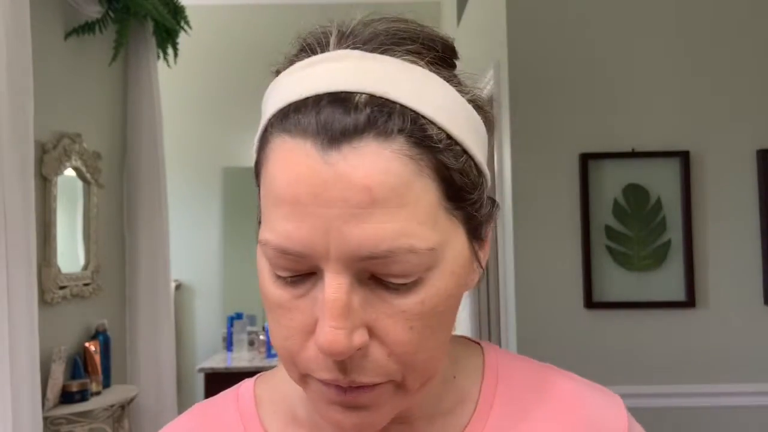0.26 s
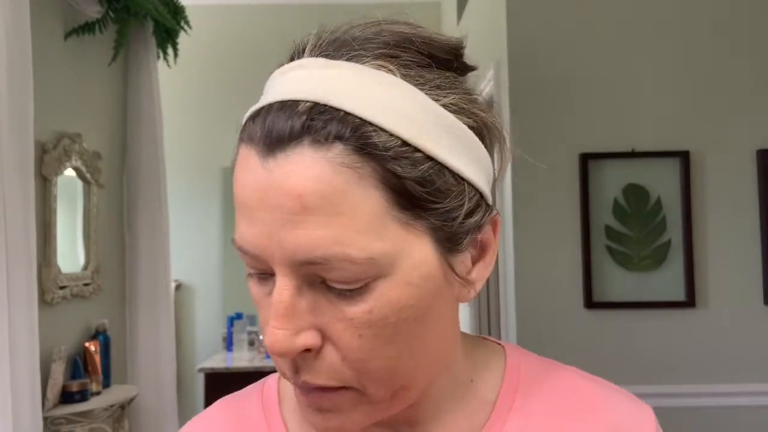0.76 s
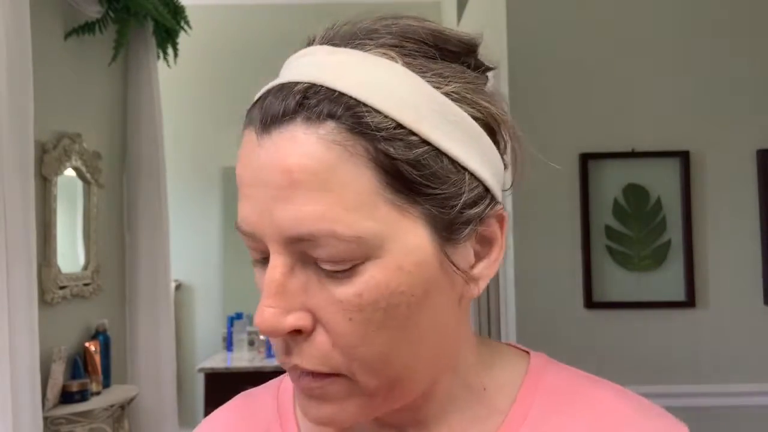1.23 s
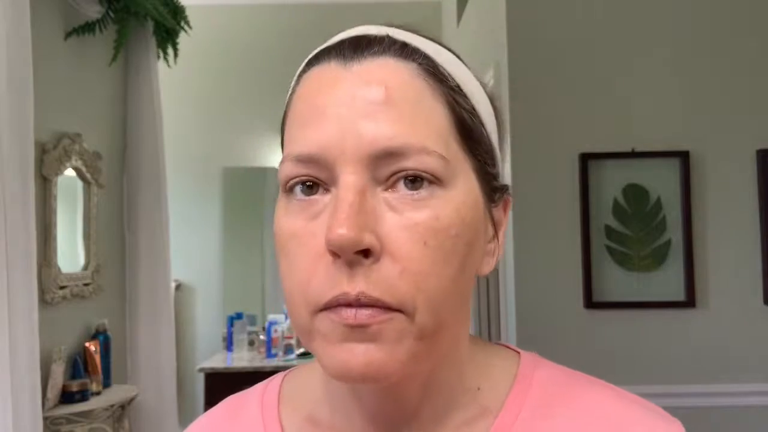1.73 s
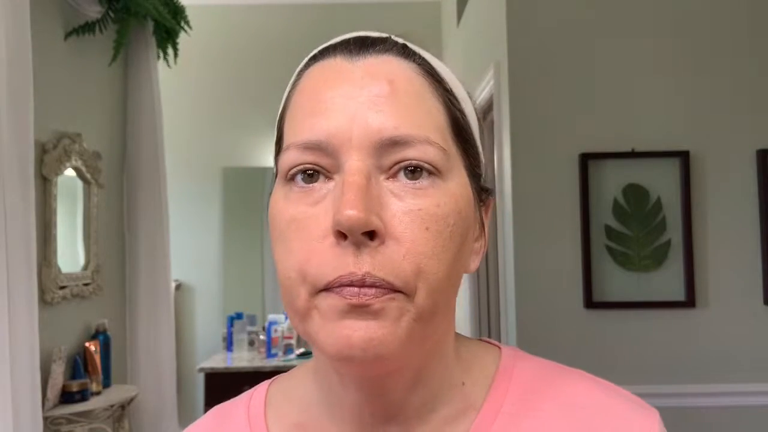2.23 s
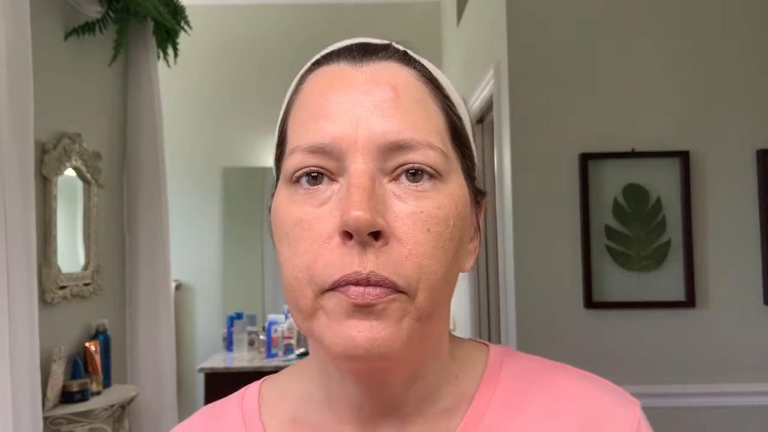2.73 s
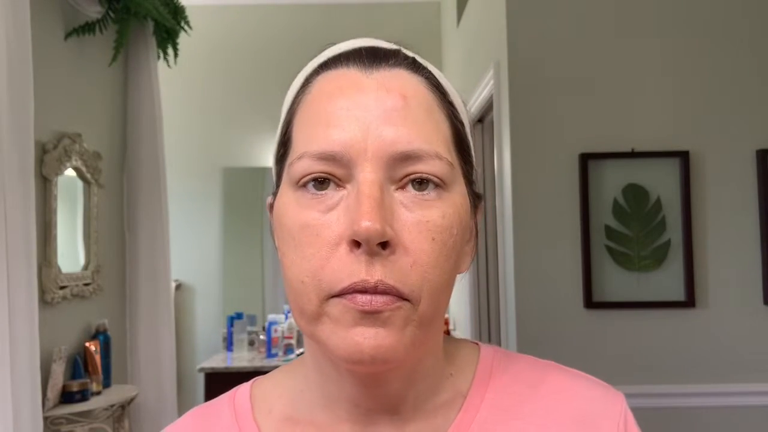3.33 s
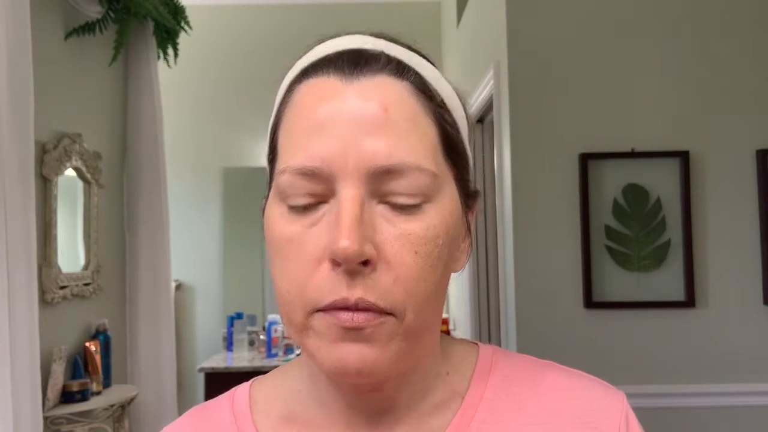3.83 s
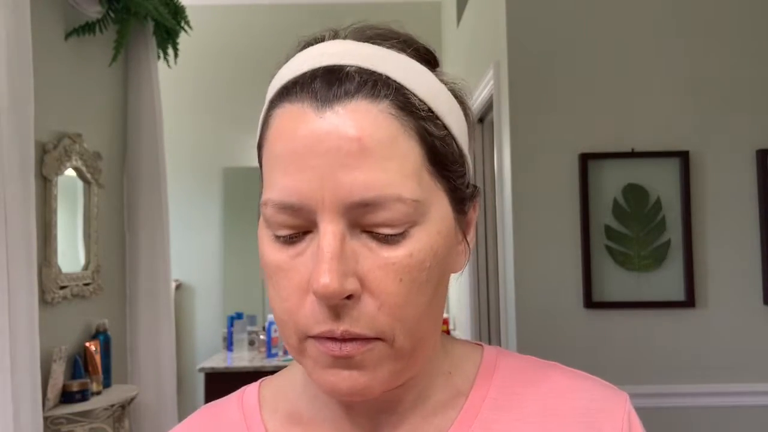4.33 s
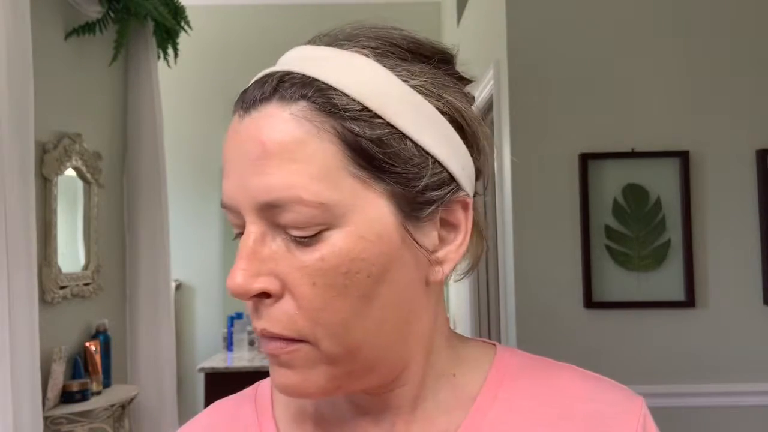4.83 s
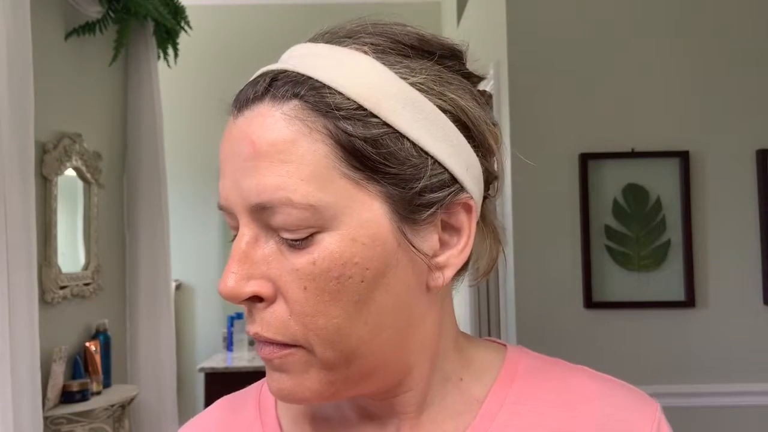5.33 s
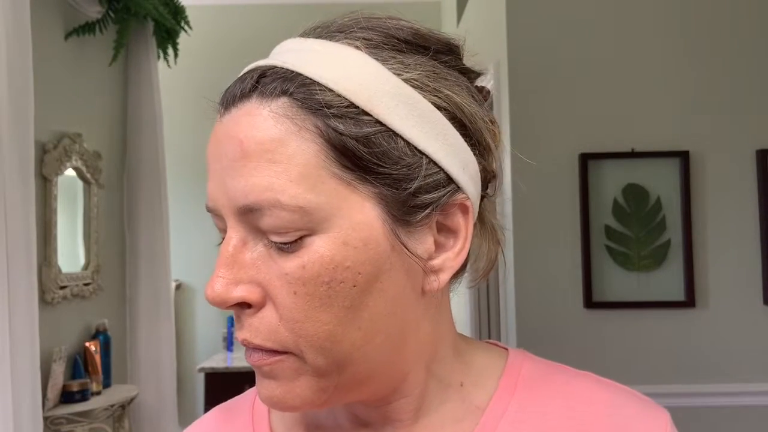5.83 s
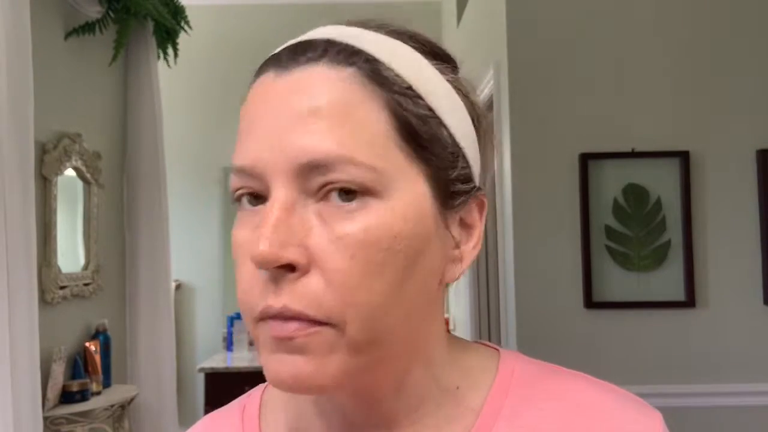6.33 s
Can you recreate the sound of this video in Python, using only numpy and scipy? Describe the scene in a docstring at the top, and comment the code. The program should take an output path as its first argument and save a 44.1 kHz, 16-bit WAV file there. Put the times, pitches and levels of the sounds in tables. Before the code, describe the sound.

Small plastic cosmetic containers are set down one by one on a wooden table with sharp clacks and light taps, over a low fan hum.

```python
"""Makeup containers on a wooden table

Containers are picked up and set down in a small, hard-walled room over a ventilation fan.
Each blow rings a container's damped modes and thuds the table top; nails tick, brush handles tap.
Scuffs, drags and pushes are grains of friction noise; the fan is low lines plus coloured noise.
A phone with two microphone ports stands close by: direct sound, room reflections, top cut."""
import sys
import numpy as np
from scipy import signal
from scipy.fft import rfft, irfft
from scipy.io import wavfile

SR = 44100
rng = np.random.default_rng(int(sys.argv[2]) if len(sys.argv) > 2 else 0)


def unload_audio(sound):
    """Save the sound as a 16-bit wav file, at the path given as the first command line argument."""
    columns = np.transpose(np.atleast_2d(sound))
    # keep every value between -1 and 1, then stretch to whole-number steps
    steps = np.round(np.clip(columns, -1, 1) * 32767)
    wavfile.write(sys.argv[1], SR, steps.astype(np.int16))


N = 289648
TIME = np.arange(N) / SR  # s


def undb(db):
    """Decibels to gain."""
    return 10 ** (np.asarray(db) / 20)


def unit(x):
    """Scale to an energy of one."""
    return x / np.sqrt(np.sum(x ** 2))


def lookup(points, hz):
    """Read (Hz, value) points on a log-frequency axis."""
    point_hz, value = np.transpose(points)
    return np.interp(np.log(np.maximum(hz, 1)), np.log(point_hz), value)


def bins(x):
    """Frequencies of the spectrum of x, Hz."""
    return np.fft.rfftfreq(x.shape[-1], 1 / SR)


def colour(x, points):
    """Filter by (Hz, dB) points."""
    return irfft(rfft(x) * undb(lookup(points, bins(x))), x.shape[-1])


def brighten(x, slope_db):
    """Causal tilt in dB/octave about 2.5 kHz, level below 800 Hz: a harder contact is brighter."""
    octaves = np.log2(np.maximum(bins(x), 800) / 2500)
    log_gain = np.log(undb(slope_db * octaves))
    # fold the cepstrum: minimum phase
    cepstrum = irfft(log_gain, len(x))
    cepstrum[1:len(x) // 2] *= 2
    cepstrum[len(x) // 2 + 1:] = 0
    return irfft(rfft(x) * np.exp(rfft(cepstrum)), len(x))


def add(track, s, x):
    """Mix x into the track at time s."""
    i = int(s * SR)
    track[..., i:i + x.shape[-1]] += x[..., :N - i]


def ring(modes, scatter_db):
    """Damped modes of alternating sign; their strengths depend on where the blow lands."""
    t = TIME[:SR // 3]
    hz, width_hz, db = np.transpose(modes)[:, :, None]
    strength = width_hz * undb(db + scatter_db * rng.standard_normal(hz.shape))
    strength[1::2] *= -1
    decay = np.exp(-np.pi * width_hz * t)
    return unit(np.sum(strength * decay * np.sin(2 * np.pi * hz * t), axis=0))


def chatter(x, gap_s, rebound, count=3):
    """Micro-bounces of a settling edge: all-pass combs spread a blow in time, keep its colour."""
    spectrum, g = rfft(x), np.clip(rebound, 0, .8)
    for gap in gap_s * (.5 + rng.random(count)):
        delay = np.exp(-2j * np.pi * bins(x) * np.ceil(gap * SR) / SR)
        spectrum = spectrum * (delay - g) / (1 - g * delay)
    return irfft(spectrum, len(x))


# treble dips in fan, slides and reverberation: f/Hz, width/Hz
TREBLE_DIPS = [(9750, 1300), (13600, 1600)]


def dip_treble(x):
    """Two narrow treble dips, for fan, slides and reverberation."""
    for hz, width_hz in TREBLE_DIPS:
        x = signal.lfilter(*signal.iirnotch(hz, hz / width_hz, fs=SR), x)
    return x


# reverberation: f/Hz, t60/s
ROOM_DECAY = [(100, 1.2), (300, .5), (800, 0.73), (2000, 0.64), (4000, 0.6153), (8000, 0.44), (15000, 0.55)]
# reflections: f/Hz, level/dB
WALL_COLOUR = [(100, -7.5), (400, 9.5), (750, 4.5), (1500, 1.5), (3000, 0.5), (5000, -0.5), (8000, 2),
               (15000, -11.5)]


def room(x, near_db, early_db, early_s, late_db):
    """Table-top scatter, quick wall reflections, diffuse tail: decaying noise, bass alike at both ports."""
    t = TIME[:SR]
    mid, side = rng.standard_normal((2, len(t)))
    hz = bins(t)
    alike = 1 / (1 + (hz / 420) ** 2)
    side_sign = np.array([[1], [-1]])
    field = rfft(mid) * np.sqrt(1 + alike) + side_sign * rfft(side) * np.sqrt(1 - alike)
    octave = np.log2(np.clip(hz, 125, 16000) / 125)
    tail = 0
    for k in np.arange(8):
        t60_s = lookup(ROOM_DECAY, 125 * 2 ** k)
        band = irfft(field * np.maximum(1 - abs(octave - k), 0))
        tail = tail + band * np.exp(-np.log(1000) * t / t60_s)
    late = tail * np.clip(t / 0.0074, 0, 1)
    near = irfft(field) * np.exp(-t / 0.00098)
    early = irfft(field) * np.exp(-t / early_s) * (t > .002)
    walls = undb(early_db) * unit(early) + undb(late_db) * unit(late)
    response = undb(near_db) * unit(near) + dip_treble(colour(walls, WALL_COLOUR))
    return signal.fftconvolve(x[None], response, axes=1)[:, :N]


def ports(x, lag_ms, left_db=0):
    """Direct sound: the things stand to the left, so the right port hears them later, if lagged."""
    late = np.interp(TIME - lag_ms / 1000, TIME, x)
    return np.array([x * undb(left_db / 2), late * undb(-left_db / 2)])


CATCH_HZ, CATCH_DB = 260, 4.5  # stick-slip cluster rate, unevenness


def catches(grain_db):
    """A quarter second of stick and slip: fine grains that arrive in uneven clusters."""
    t = TIME[:SR // 4]
    grains, size, grip = rng.standard_normal((3, len(t)))
    clusters = np.interp(t * CATCH_HZ, np.arange(len(t)), grip)
    return grains * undb(grain_db * np.minimum(size, 2) + CATCH_DB * clusters)


RATTLE_S, RATTLE_GRAIN_DB, RATTLE_WIDEN = 0.015, 3, 2.3  # decay, unevenness, mode-width factor


def rattle(modes):
    """Loose lids and contents buzz briefly against the shell, damped by their own contact."""
    grains = catches(RATTLE_GRAIN_DB)
    buzz = grains * np.exp(-TIME[:len(grains)] / RATTLE_S)
    damped_modes = [(hz, width_hz * RATTLE_WIDEN, db) for hz, width_hz, db in modes]
    shell = ring(damped_modes, scatter_db=2)
    return unit(signal.fftconvolve(buzz, shell)[:len(shell)])


RADIATION_HZ = 540  # small shells radiate little below this


def container(blows, modes, gain_db, gap_s, rebound, crack_hz, rattle_db=None):
    """Each blow rings the shell's modes, plus a dry contact crack and a rattle of any loose parts."""
    out, t = np.zeros(N), TIME[:SR // 3]
    contact = unit(t * np.exp(-2 * np.pi * crack_hz * t))
    for s, db, slope_db, crack_db in blows:
        shell = chatter(ring(modes, scatter_db=1.25), gap_s, rebound)
        if rattle_db is not None:
            shell = shell + undb(rattle_db) * rattle(modes)
        crack = undb(crack_db) * chatter(contact, gap_s, rebound)
        add(out, s, undb(db + gain_db) * brighten(shell + crack, slope_db))
    high_pass = signal.butter(2, RADIATION_HZ, "high", fs=SR, output="sos")
    return signal.sosfilt(high_pass, out)


# fan and motor lines: f/Hz, level/dB
FAN_LINES = [(37.7, -57.5), (59.2, -57.5), (98.8, -52.5)]
# air rush, relative: f/Hz, level/dB
AIR_COLOUR = [(20, -7.5), (38, -18), (60, 0.5), (80, -11.5), (105, -12.5), (125, -11.5), (150, -31.5),
              (270, -22), (420, -32.5), (700, -47), (1350, -45), (2200, -53.5), (6000, -62), (11000, -55),
              (16000, -63.5)]
AIR_DB = -52.5


def fan(waver, beat_hz):
    """Wavering low lines over a soft rush of air, whose bass is shared by both ports."""
    hum = 0
    knots_s = np.arange(0, TIME[-1] + 1, 1 / beat_hz)
    for hz, db in FAN_LINES:
        a, b = (np.interp(TIME, knots_s, rng.standard_normal(len(knots_s))) for _ in range(2))
        phase = 2 * np.pi * (hz * TIME + rng.random())
        line = (1 + waver * a) * np.sin(phase) + waver * b * np.cos(phase)
        hum = hum + undb(db) * np.sqrt(2) * line
    mid, side = (colour(rng.standard_normal(N), AIR_COLOUR) for _ in range(2))
    side = colour(side, [(60, -17.5), (150, -11.0), (400, -11.5), (1500, 0.0), (8000, -0.5)])
    air = (mid + np.array([[1], [-1]]) * side) / np.std(mid)
    return undb(-2.0) * hum + undb(AIR_DB) * air


TICK_CRACK_DB = -12  # re ring, ticks and taps
# nail ticks: t/s, level/dB, brightness/(dB/octave)
NAIL_TICKS = [(0.3456, -37, 5.5), (0.361, -30, -2), (0.5769, -23, -4.5), (0.639, -30.5, -2.5),
              (0.6959, -32, 0), (0.718, -27, -4.5), (0.728, -49, -9), (0.74, -28.5, -2.5),
              (1.864, -48.5, -1.5), (4.238, -34, -2), (4.258, -40, -5), (4.349, -35, -2), (6.4, -36, -3)]
# tick modes: f/Hz, width/Hz, level/dB
TICK_MODES = [(2350, 1360, -7.5), (4530, 3600, -9.5), (8570, 220, 1), (12300, 890, -5), (15440, 1800, -11)]


def ticks():
    """Nails tick on plastic: very short, broad modes."""
    blows = [(*tick, TICK_CRACK_DB) for tick in NAIL_TICKS]
    return container(blows, TICK_MODES, gain_db=3.5, gap_s=0.00037, rebound=0.9, crack_hz=9390)


# set-downs: t/s, level/dB, brightness/(dB/octave), crack/dB, table thud/dB, frame boom/dB,
# edge thud f/Hz, base thud f/Hz, time until flat/s, thing
CONTAINER_SET_DOWNS = [(0.4467, -11, -2, -16, -26, -8.5, 447.4, 460, 0.01, "compact"),
                       (2.3513, -14, -1, -26, -27, -22, 300, 215, 0.0075, "jar"),
                       (3.1532, -15, 0, -2.5, -29, -39, 520, 180, 0.0033, "pot"),
                       (4.0546, -16, 0, -4, -27.5, -13.5, 400, 170, 0.0032, "tube"),
                       (5.926, -13.5, 1, -12, -25, -7, 500, 190, .007, "bottle"),
                       (6.1758, -7, -2.2, -21.5, -31.5, -7.5, 344, 232, 0.004, "case")]
# hand nudges, scuff and rock: t/s, level/dB, brightness/(dB/octave), table thud/dB, frame boom/dB,
# thud f/Hz, thing
HAND_NUDGES = [(0.647, -42.5, -8.5, -40.5, -10, 540, "compact"),
               (0.654, -45, -14, -40, -24, 700, "compact"), (0.676, -38, -5, -55, -16, 556, "compact"),
               (0.736, -36.5, -11, -37.5, -30, 560, "compact"), (0.832, -59, -15, -49, -36, 600, "compact"),
               (2.502, -40, -3, -42.5, -37, 427, "jar"), (2.695, -34, 0, -41, -30.5, 220, "case"),
               (2.704, -40.5, -2.5, -48.5, -35, 260, "case"), (2.716, -63.5, 5, -59.5, -39.5, 260, "case"),
               (2.885, -49, -0.5, -44.5, -44, 236, "pot"), (3.119, -31.5, -0.5, -33.5, -28, 496, "pot"),
               (3.149, -31, 2.5, -29.5, -28.5, 570, "pot"), (3.189, -35.5, -7.5, -41.5, -29.5, 614, "pot"),
               (3.399, -47, 1, -41, -46, 540, "pot"), (3.913, -37.5, -0.5, -42, -38.5, 513, "tube"),
               (4.043, -33.5, -5, -33.5, -34, 510, "tube"), (4.257, -36.5, -1, -39.5, -17, 305, "tube"),
               (4.342, -41, -7, -35.5, -14.5, 290, "tube"), (4.386, -38, -6.5, -37.5, -33, 412, "tube"),
               (4.394, -32, -6, -43.5, -21, 413, "tube")]
ROCK_S, NUDGE_CRACK_DB, NUDGE_BASE_HZ = 0.0069, -10.5, 241.1


def landings():
    """Set-downs and nudges alike, in the columns of the set-downs."""
    rocks = [(s, db, slope_db, NUDGE_CRACK_DB, thud_db, frame_db, thud_hz, NUDGE_BASE_HZ, ROCK_S, thing)
             for s, db, slope_db, thud_db, frame_db, thud_hz, thing in HAND_NUDGES]
    return CONTAINER_SET_DOWNS + rocks


# base blow re edge blow: softer, duller, more crack re ring
FLAT_DB, FLAT_SLOPE_DB, FLAT_CRACK_DB = -12.5, -4, 6.5


def blows_on(name):
    """Two blows per landing of one thing, edge then base: (t/s, level/dB, brightness, crack/dB)."""
    blows = []
    for s, db, slope_db, crack_db, _, _, _, _, flat_s, thing in landings():
        if thing == name:
            edge = (s, db, slope_db, crack_db)
            base = (s + flat_s, db + FLAT_DB, slope_db + FLAT_SLOPE_DB, crack_db + FLAT_CRACK_DB)
            blows += [edge, base]
    return blows


# compact modes: f/Hz, width/Hz, level/dB
COMPACT_MODES = [(743, 170, -12.5), (1050, 280, -10.5), (1430, 390, -14.5), (1892, 220, -10),
                 (2350, 250, -9), (2720, 280, -1.5), (3222, 380, 3), (3628, 480, 0.5), (4336, 540, 3),
                 (4820, 610, 0), (5554, 480, -12.5), (6600, 790, -22), (8556, 900, -18),
                 (10900, 440, -16.5)]


def compact():
    """Compact: shell modes strongest at 2.7-4.8 kHz, loose parts rattle."""
    return container(blows_on("compact"), COMPACT_MODES, gain_db=15.5, gap_s=0.0003, rebound=0.57,
                     crack_hz=5010, rattle_db=-11)


# table-top modes: f/Hz, width/Hz, level/dB
TOP_MODES = [(161, 32.3, 3.5), (210, 45, 1), (250, 27, 0), (292, 20, -4.5), (327, 34, -1), (364, 40, -4.5),
             (457, 40, -2.5), (537.4, 46, -1.5), (665, 50, -14), (928, 140, -12)]


def table_modes(centre_hz, focus_db):
    """A contact favours the table modes near its own pitch, by focus_db per octave."""
    return [(hz, width_hz, db - focus_db * abs(np.log2(hz / centre_hz)))
            for hz, width_hz, db in TOP_MODES]


# table-frame modes: f/Hz, width/Hz, level/dB
FRAME_MODES = [(97.6, 3.7, 5.5), (114, 13, -3.5), (156, 30, -13)]
FLAT_THUD_DB = -2  # base thud re edge thud


def table(focus_db):
    """Edge and base each thud the wooden top; the weight then rocks the frame."""
    out = np.zeros(N)
    for s, _, _, _, thud_db, frame_db, edge_hz, base_hz, flat_s, _ in landings():
        edge = (s, thud_db, edge_hz)
        base = (s + flat_s, thud_db + FLAT_THUD_DB, base_hz)
        for at_s, blow_db, centre_hz in [edge, base]:
            thud = ring(table_modes(centre_hz, focus_db), scatter_db=3.0)
            add(out, at_s, undb(blow_db + 15.0) * thud)
        add(out, s + flat_s, undb(frame_db) * ring(FRAME_MODES, scatter_db=5.0))
    direct = undb(2.0) * ports(out, lag_ms=0.18, left_db=0.1)
    return direct + room(out, near_db=-15, early_db=-3.5, early_s=0.0073, late_db=-3.5)


# friction colour: f/Hz, level/dB
FRICTION_COLOUR = [(300, -28), (780, -22), (1000, -9), (1230, 0), (1450, -7), (2100, -6.5), (3200, -12),
                   (4600, -12.5), (6000, -17), (8500, -13), (12500, -18), (16000, -25)]
# drags over the wood: t/s, length/s, level/dB, brightness/(dB/octave)
WOOD_DRAGS = [(0.589, 0.12, -52, -1.5), (0.798, 0.11, -63, -16), (4.214, 0.096, -44, 10.5),
              (4.29, 0.081, -44.5, 10), (4.646, 0.12, -59, -4), (4.701, 0.058, -41.5, 4.5),
              (4.722, 0.079, -38.5, -1.5)]
# a scuff leads its nudge; level and brightness re nudge
SCUFF_LEAD_S, SCUFF_S, SCUFF_DB, SCUFF_SLOPE_DB = 0.02, 0.049, -24.5, 1.5
DRAG_SWELL_DB = 4.5  # rise over a drag, on top of the stroke


def slides(grain_db):
    """Friction: tiny catches of uneven size, swelling and fading with the stroke."""
    out, t = np.zeros(N), TIME[:SR // 4]
    scuffs = [(s - SCUFF_LEAD_S, SCUFF_S, db + SCUFF_DB, slope_db + SCUFF_SLOPE_DB, 0)
              for s, db, slope_db, *_ in HAND_NUDGES]
    drags = [(*drag, DRAG_SWELL_DB) for drag in WOOD_DRAGS]
    for s, length_s, db, slope_db, swell_db in scuffs + drags:
        progress = np.clip(t / length_s, 0, 1)
        stroke = np.sin(np.pi * progress) * undb(swell_db * (progress - 3.0))
        rub = brighten(colour(catches(grain_db), FRICTION_COLOUR), slope_db)
        add(out, s, undb(db) * stroke * rub / np.std(rub))
    direct = ports(out, lag_ms=0.077)
    return direct + room(out, near_db=-13.5, early_db=3.5, early_s=0.0057, late_db=-3)


# handle taps: t/s, level/dB, brightness/(dB/octave), f/Hz
HANDLE_TAPS = [(0.677, -37, 3, 2700), (0.718, -35.5, 4, 2750), (1.265, -37.5, 0, 2450),
               (2.952, -40.5, -1.5, 1900), (3.665, -47, -2.5, 2350), (5.054, -38, -0.5, 1970),
               (5.224, -37.5, 0, 2050)]
# handle modes: f/tap f, width/Hz, level/dB
HANDLE_MODES = [(.73, 826, -9), (1, 200, 1.5), (1.22, 230, -9), (1.67, 660, -13), (2.41, 730, -23),
                (3.97, 618, -11.5), (6.1, 1500, -14.5)]


def taps():
    """Brush handles tap with a short woody note: modes scale with each tap's pitch."""
    out = np.zeros(N)
    for s, db, slope_db, hz in HANDLE_TAPS:
        modes = [(ratio * hz, width_hz, mode_db) for ratio, width_hz, mode_db in HANDLE_MODES]
        out += container([(s, db, slope_db, TICK_CRACK_DB)], modes, gain_db=1.0, gap_s=0.00041,
                         rebound=0.72, crack_hz=9000)
    return out


# slow pushes along the wood: t/s, length/s, rub level/dB, table level/dB
SLOW_PUSHES = [(1.804, 0.074, -61.5, -84), (1.843, 0.13, -60, -60.5), (1.949, 0.11, -69.5, -71)]
# container-base modes: f/Hz, width/Hz, level/dB
BASE_MODES = [(760, 180, -3.5), (970, 170, -0.5), (1134, 126, 4), (1290, 160, -1), (1414, 75, -4.5),
              (2450, 190, -17)]


def pushes(grain_db):
    """Slow, soft friction hums dully in the container's base and in the table top."""
    out, t = np.zeros(N), TIME[:SR // 4]
    for s, length_s, rub_db, table_db in SLOW_PUSHES:
        stroke = np.sin(np.pi * np.clip(t / length_s, 0, 1))
        top_modes = table_modes(centre_hz=500, focus_db=17)
        for modes, db in [(BASE_MODES, rub_db), (top_modes, table_db)]:
            rub = signal.fftconvolve(catches(grain_db), ring(modes, scatter_db=1))[:len(t)]
            add(out, s, undb(db) * stroke * rub / np.std(rub))
    direct = undb(-3.0) * ports(out, lag_ms=0, left_db=4.5)
    return direct + room(out, near_db=-20, early_db=-12, early_s=0.017, late_db=-9)


# jar modes: f/Hz, width/Hz, level/dB
JAR_MODES = [(1264, 160, -7), (1510, 190, -6.5), (2170, 140, 2), (2380, 240, 0.5), (2700, 220, -3),
             (2880, 250, -8), (3540, 110, -2), (3880, 140, -5), (4710, 210, -10.5), (5030, 120, -8.5),
             (7200, 1100, -17.5), (8500, 150, -9.5), (11360, 1000, -20.5), (15360, 1400, -23.5)]


def jar():
    """Jar: mostly narrow shell modes from 1.3 kHz up, loose parts rattle."""
    return container(blows_on("jar"), JAR_MODES, gain_db=9.0, gap_s=0.00066, rebound=0.45,
                     crack_hz=12800, rattle_db=-11.5)


# case modes: f/Hz, width/Hz, level/dB
CASE_MODES = [(870, 210, -12.5), (1090, 94, -3.5), (1286, 110, -1.5), (1490, 83, 4.5), (1700, 120, 2.5),
              (2045, 91, 1.5), (2260, 61, 4), (2760, 220, -1.5), (3100, 290, -3), (3720, 520, -9),
              (4500, 720, -12.5), (5900, 3800, -20.5), (8670, 670, -16.5), (11200, 900, -23)]


def case():
    """Case: shell modes strongest at 1.5-2.3 kHz, no rattle."""
    return container(blows_on("case"), CASE_MODES, gain_db=8.0, gap_s=0.00056, rebound=0.51,
                     crack_hz=4040)


# pot modes: f/Hz, width/Hz, level/dB
POT_MODES = [(745, 60, -6), (960, 75, 2), (1265, 160, -1.5), (1560, 320, 1), (1800, 260, 4.5),
             (2280, 450, 0), (2640, 260, 3.5), (3580, 220, 4), (3966, 260, 2), (4550, 500, -6),
             (5440, 630, -17.5), (8130, 400, -9.5), (11800, 2200, -11.5), (14700, 1700, -8.5)]


def pot():
    """Pot: shell modes strongest at 1-4 kHz, with the strongest rattle."""
    return container(blows_on("pot"), POT_MODES, gain_db=10.0, gap_s=.0006, rebound=0.53,
                     crack_hz=12100, rattle_db=-7)


# tube modes: f/Hz, width/Hz, level/dB
TUBE_MODES = [(900, 200, -5.5), (1286, 200, 3.5), (1600, 250, 0), (2000, 160, 3), (2320, 200, 5),
              (2790, 260, 1.5), (3560, 600, -2.5), (4820, 480, -4), (6700, 730, -8.5), (8200, 700, -8.5),
              (11360, 190, 1)]


def tube():
    """Tube: shell modes strongest at 1.3-2.8 kHz, loose parts rattle."""
    return container(blows_on("tube"), TUBE_MODES, gain_db=11.0, gap_s=0.00055, rebound=0.57,
                     crack_hz=9000, rattle_db=-9.5)


# bottle modes: f/Hz, width/Hz, level/dB
BOTTLE_MODES = [(660, 83, -9.5), (868, 48, 0), (1115, 110, -3), (1230, 116, 0), (1420, 200, 2),
                (1700, 184, 2), (1955, 180, -2.5), (2350, 180, -8.5), (3060, 290, -15.5),
                (3800, 1100, -18.5), (4820, 1000, -24.5), (11000, 3900, -37)]


def bottle():
    """Bottle: low shell modes strongest at 0.9-1.7 kHz, dull crack, no rattle."""
    return container(blows_on("bottle"), BOTTLE_MODES, gain_db=13.0, gap_s=0.00052, rebound=0.72,
                     crack_hz=1790)


def containers():
    """Containers, nail ticks and handle taps in four groups, each with its own place and reflections."""
    small = ticks() + taps()
    first = compact()
    middle = jar() + pot() + tube()
    last = bottle() + case()
    return (ports(small, lag_ms=0.0235)
            + room(small, near_db=-41, early_db=-0.5, early_s=0.0082, late_db=-3.5)
            + ports(first, lag_ms=0.14, left_db=4.0) * undb(-1.0)
            + room(first, near_db=-13.5, early_db=-8.5, early_s=0.024, late_db=-7)
            + ports(middle, lag_ms=0.11, left_db=1.0)
            + room(middle, near_db=-11.0, early_db=-2.5, early_s=0.004, late_db=-3.5)
            + ports(last, lag_ms=0.023, left_db=1.5) * undb(-1.0)
            + room(last, near_db=2, early_db=-18.0, early_s=0.015, late_db=-0.5))


def scene():
    """Fan, containers, table and handling; fan and slides share two treble dips."""
    dipped = dip_treble(fan(waver=0.077, beat_hz=23.0) + slides(grain_db=5.5))
    return dipped + containers() + table(focus_db=9.5) + pushes(grain_db=6.5)


TOP_HZ = 16200


def record(dry):
    """The phone cuts the top: steep elliptic low-pass."""
    low_pass = signal.ellip(8, .2, 70, TOP_HZ, fs=SR, output="sos")
    return signal.sosfilt(low_pass, dry)


dry = scene()
out = record(dry)
unload_audio(out)
```